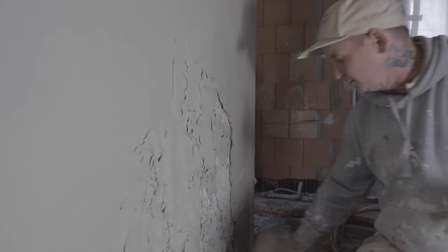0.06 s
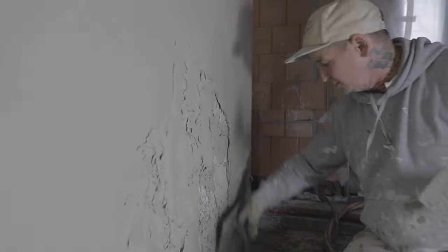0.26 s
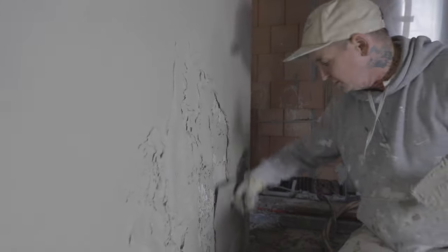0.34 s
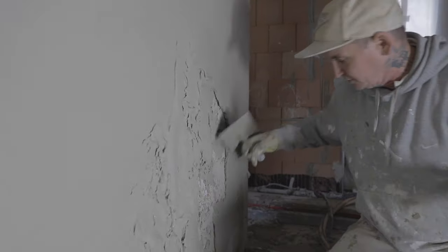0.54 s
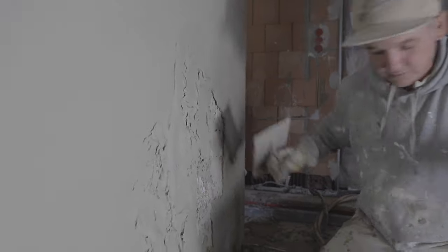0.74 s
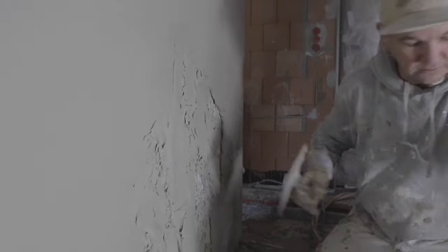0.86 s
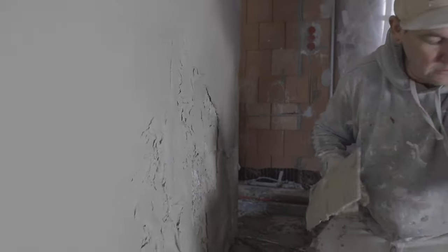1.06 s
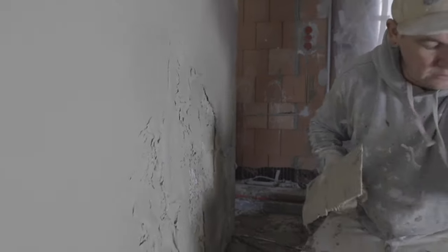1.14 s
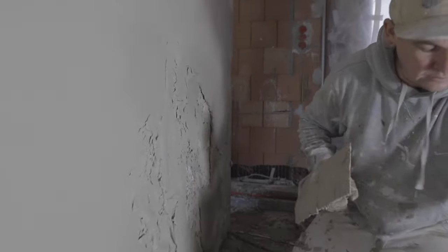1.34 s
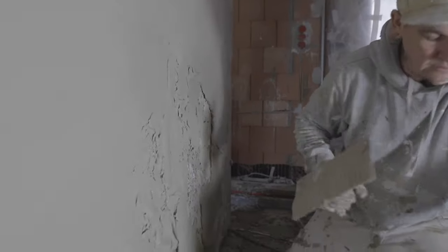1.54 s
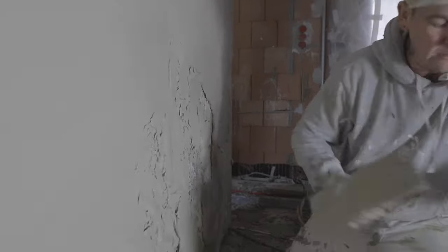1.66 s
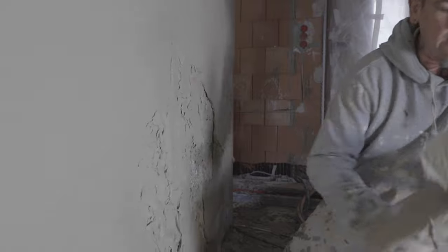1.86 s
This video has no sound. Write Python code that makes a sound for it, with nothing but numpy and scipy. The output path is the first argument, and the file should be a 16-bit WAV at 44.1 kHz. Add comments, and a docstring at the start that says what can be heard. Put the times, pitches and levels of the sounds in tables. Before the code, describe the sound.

A steel trowel knocks a hollow tub, scrapes gritty wet plaster, then taps and scrapes a hand float

```python
"""Bare masonry room, one microphone: a plasterer's steel trowel knocks a hollow tub, then drags through gritty
wet plaster, loud at first and dying away. Faint bright ticks follow as wet plaster lets go; then the blade taps
and scrapes the float in his other hand. Contacts are noise bursts exciting decaying modes, scrapes are random
sand grains. The walls ring after each sound; deep rumble follows the heavier moves. A faint site wash lies
under it all, with soft narrow swells far off near the start, middle and end."""
import sys
import numpy as np
from scipy import signal
from scipy.fft import rfft, irfft
from scipy.io import wavfile
from scipy.ndimage import uniform_filter1d

SR = 44100
rng = np.random.default_rng(int(sys.argv[2]) if len(sys.argv) > 2 else 0)


def master(y):
    """Save y as 16-bit WAV."""
    cut = np.clip(np.atleast_2d(y).T, -1, 1)
    pcm = np.round(cut * 32767)  # scale
    wavfile.write(sys.argv[1], SR, pcm.astype(np.int16))


def gain_from_decibels(decibels):
    """Convert decibel values to linear amplitude factors."""
    exponent = np.asarray(decibels, float) / 20
    return 10 ** exponent


N = 83790  # samples
T = np.arange(N) / SR  # s


def unit(x):
    """Scale to an rms of 1."""
    return x / np.sqrt(np.mean(x ** 2))


def unit_energy(x):
    """Scale to a sum of squares of 1."""
    return x / np.sqrt(np.sum(x ** 2))


def conv(x, response):
    """Let a signal excite a response, cut to the scene's length."""
    return signal.fftconvolve(x, response)[:N]


def fade(t60):
    """Exponential decay to -60 dB in t60 s."""
    return np.exp(-np.log(1000) * T / t60)


def colour(x, points):
    """Shape a spectrum by (f/Hz, level/dB) points; it drops abruptly beyond both ends."""
    hz, db = np.array(points, float).T
    f = np.maximum(np.fft.rfftfreq(len(x), 1 / SR), 1)
    gain_db = np.interp(np.log(f), np.log(hz), db, left=db[0] - 14.5, right=db[-1] - 30)
    return irfft(rfft(x) * gain_from_decibels(gain_db), len(x))


def band(x, hz, width_hz):
    """One broad resonance."""
    return signal.lfilter(*signal.iirpeak(min(hz, 0.4 * SR), hz / width_hz, fs=SR), x)


def walk(rate_hz):
    """Random levels, held and slewed; spread near 1."""
    hold = int(SR / rate_hz)
    steps = np.repeat(rng.standard_normal(N // hold + 1), hold)
    slewed = uniform_filter1d(uniform_filter1d(steps, hold), hold)
    return 2.16 * slewed[:N]


# Knocks of the trowel: t/s, crack level/dB, crack centre f/Hz, bright edge level/dB,
# hollow body level/dB, plate level/dB
TROWEL_KNOCKS = [(0.2390, -22.5, 1674, -21.5, -10, -18.5), (0.2402, -22, 3570, -32, -52, -33),
                 (.2425, -20, 948, -26.5, -36, -29), (1.1917, -30.5, 2350, -50, -65, -12),
                 (1.1990, -44, 1930, -53, -40, -17.5), (1.258, -29, 1170, -63, -14, -7.5),
                 (1.278, -41, 990, -67, -17, -44), (1.3640, -27, 1950, -51, -63, -21),
                 (1.3715, -35, 5400, -60, -29, -11), (1.3846, -24, 3400, -44, -30, -26),
                 (1.3853, -25, 5200, -53, -57, -52), (1.4164, -24, 1980, -42, -30, -34),
                 (1.4190, -31, 926, -60, -22, -19), (1.476, -39, 4000, -60, -32, -57),
                 (1.495, -51, 2000, -68, -29, -30.5), (1.540, -56, 1990, -70, -31.5, -29),
                 (1.5570, -37.5, 1370, -58, -35.5, -34), (1.5739, -33.5, 4170, -50, -62, -42),
                 (1.5866, -34, 1450, -66, -47, -23.5), (1.6333, -35, 4550, -74, -54, -37),
                 (1.64, -34, 3460, -63, -59, -21.5), (1.675, -41, 4780, -66, -43, -27),
                 (1.6930, -38.5, 4160, -54, -55, -28), (1.7071, -31.5, 2100, -53, -50, -26.5),
                 (1.716, -40.5, 2700, -58, -33, -22.5)]


def knocks(tub, float_body):
    """Each knock cracks, then rings the hollow body and the steel plate in its own shares."""
    size = 4096
    out, to_body = np.zeros(N + size), np.zeros(N)
    noise = rng.standard_normal((len(TROWEL_KNOCKS), 2, size))
    pitch_s, pitch = np.array(PLATE_TUNING).T
    for (s, db, hz, edge_db, body_db, plate_db), (crack_noise, edge_noise) in zip(TROWEL_KNOCKS, noise):
        i = int(s * SR)
        crack = burst(crack_noise, hz, 0.4 * hz, 0.016)
        edge = burst(np.diff(edge_noise, prepend=0), 9000, 17000, 0.014)  # differencing brightens it
        plate = ring_plate(np.interp(s, pitch_s, pitch))[:size]
        out[i:i + size] += gain_from_decibels(db) * crack + gain_from_decibels(edge_db) * edge - gain_from_decibels(plate_db) * plate
        to_body[i] = gain_from_decibels(body_db)
    return out[:N] + hollow(to_body, tub, float_body)


def burst(noise, hz, width_hz, t60):
    """Contact: a click and a short rattle of noise in one broad resonance, peak near 1."""
    rise_s, click_share = 0.0005, 1.22  # share: first contact against the rattle after it
    t = T[:len(noise)]
    shape = fade(t60)[:len(noise)] * (1 - np.exp(-t / rise_s))
    rattle = band(noise, hz, width_hz) * shape
    rattle = rattle * np.sqrt(np.sum(shape ** 2) / np.sum(rattle ** 2))
    click = click_share * np.sin(2 * np.pi * hz * t) * np.exp(-0.35 * hz * t)
    return 2 * band(rattle + click, hz, width_hz)


# Drag of the blade, in two passages: t/s, level/dB, treble level/dB, body rumble level/dB,
# plate rumble level/dB
BLADE_DRAG = [
    [(.25, -40, -41.5, -25, -33.5), (.33, -56, -55.5, -54, -51.5), (.41, -45.5, -47, -46, -50.5),
     (.43, -36.5, -44, -38, -41.5), (.465, -32.5, -41.5, -53, -33), (.515, -31, -44.5, -38, -34),
     (.545, -34.5, -45, -41, -35), (.585, -41.5, -55.5, -59, -36.5), (.66, -49, -61, -51, -78),
     (.75, -50.5, -71, -74, -60)],
    [(1.0, -95, -63.5, -101, -94), (1.06, -84, -63, -66, -51), (1.12, -84, -66, -83, -62.5),
     (1.185, -49, -61, -65, -53), (1.2, -34, -42, -54, -38.5), (1.25, -40.5, -54, -43, -32.5),
     (1.3, -45, -54, -53, -37.5), (1.36, -40, -51, -30, -54), (1.45, -41.5, -53, -31.5, -42),
     (1.55, -50, -55, -74, -68), (1.605, -38.5, -47.5, -32.5, -40.5), (1.65, -45, -48, -51.5, -59),
     (1.7, -44, -48, -41, -49), (1.72, -31.5, -51, -38.5, -50), (1.74, -52.5, -70, -43.5, -65),
     (1.9, -82, -103, -57, -60)],
]
# Hiss of the grit, relative spectrum: f/Hz, level/dB per Hz
GRIT_HISS = [(200, -39), (330, 10), (600, -7.5), (900, 2), (1500, 1.5), (2200, -1.5), (3300, -2.5),
             (4500, -10.5), (5500, -28), (7500, -43)]
# Treble of the grit, relative spectrum: f/Hz, level/dB per Hz
GRIT_SIZZLE = [(3500, -5), (5000, -10.5), (6800, -10), (9700, -18), (14200, -21.5), (16000, -27)]


def drag(tub, float_body):
    """Sand grains catch under the blade in patches; they hiss and shake body and plate."""
    rows = np.concatenate([np.array(passage, float) for passage in BLADE_DRAG])

    def curve(column):
        return gain_from_decibels(np.interp(T, rows[:, 0], rows[:, column], left=-120))

    def patches():
        return gain_from_decibels(1.3 * walk(260))  # patchiness in dB, rate in Hz

    def damped(response, t60):
        return unit_energy(response * fade(t60))

    grains = sand_grains()
    hiss = curve(1) * patches() * unit(colour(grains, GRIT_HISS))
    sizzle = curve(2) * patches() * unit(colour(grains, GRIT_SIZZLE))
    rumble = hollow(unit(grains) * curve(3), damped(tub, 0.27), damped(float_body, 0.048))
    force = unit(grains) * curve(4) * patches()
    pitch_s, pitch = np.array(PLATE_TUNING).T
    plate = np.zeros(N)
    # the force passes from one tuning of the plate to the next
    for share, factor in zip(np.eye(len(pitch)), pitch):
        part = force * np.sqrt(np.interp(T, pitch_s, share))
        plate += conv(part, damped(ring_plate(factor), 0.046))
    return hiss + sizzle + rumble + plate


def sand_grains():
    """Sparse impulses of scattered size over a steady bed of fine noise."""
    grains_per_s = 3500  # on average
    scatter_db = np.where(T < TUB_UNTIL_S, 1.5, 3.6)  # wet in the tub, crusty on the float
    sizes = gain_from_decibels(scatter_db * rng.exponential(size=N)) * rng.standard_normal(N)
    caught = rng.random(N) < grains_per_s / SR
    return unit(np.clip(sizes, -12, 12) * caught) + 1.74 * rng.standard_normal(N)


TUB_UNTIL_S = 1  # the tub sounds before this time, the float after


def hollow(force, tub, float_body):
    """Early forces ring the tub, later ones the float."""
    early = T < TUB_UNTIL_S
    return conv(force * early, tub) + conv(force * ~early, float_body)


# Modes of the hollow tub, before the push and the bass loss: f/Hz, level/dB, t60/s
TUB_MODES = [(136, -5.5, 0.11), (217.6, 7, 0.046), (237, -4, 0.12), (271.6, -10.5, 0.325), (320, -25, 0.15),
             (436, -10.5, 0.15)]


def ring_tub():
    """The tub's decaying modes after a short push."""
    return ring(TUB_MODES)


# Modes of the float in the other hand, before the push and the bass loss: f/Hz, level/dB, t60/s
FLOAT_MODES = [(224.6, -6, 0.29), (233.8, -10.5, 0.94), (269, -1, 0.28), (294, -15, 0.13), (439, -14, 0.15)]


def ring_float():
    """The float's decaying modes after a short push."""
    return ring(FLOAT_MODES)


# Modes of the steel plate, before tuning, the push and the bass loss: f/Hz, level/dB, t60/s
PLATE_MODES = [(651.5, 1, 0.034), (734, -1.5, 0.03), (1078, -8.5, 0.04), (1184, -14, 0.066)]
# The plate rings higher or lower with how it is held and loaded: t/s, pitch factor on f
PLATE_TUNING = [(.45, 1.098), (1.3, 0.99), (1.6, 1.043), (1.69, 1.148), (1.72, 1.45)]


def ring_plate(factor):
    """The plate's decaying modes after a short push, all scaled in pitch by one factor."""
    return ring(PLATE_MODES, factor)


def ring(modes, factor=1):
    """Response of an object to a short push; it swells briefly and radiates no deep bass."""
    push_s, rise_s, radiates_from_hz = 0.00078, 0.0014, 173
    push = np.hanning(int(push_s * SR) + 2)
    response = sum(gain_from_decibels(db) * np.sin(2 * np.pi * hz * factor * T) * fade(t60) for hz, db, t60 in modes)
    response = response * (1 - np.exp(-T / rise_s))
    high_pass = signal.butter(2, radiates_from_hz, "high", fs=SR)
    return signal.lfilter(*high_pass, conv(response, push / push.sum()))


# Faint bright ticks of wet plaster letting go: t/s, level/dB
PLASTER_TICKS = [(.9705, -56), (.9890, -52), (1.0195, -52), (1.0360, -54)]


def ticks():
    """Wet plaster lets go in tiny bright clicks."""
    size = 1024
    out = np.zeros(N)
    for (s, db), noise in zip(PLASTER_TICKS, rng.standard_normal((len(PLASTER_TICKS), size))):
        i = int(s * SR)
        out[i:i + size] += gain_from_decibels(db) * burst(noise, 11800, 6400, 0.0043)
    return out


# Decay of the bare walls: f/Hz, t60/s
WALL_DECAY = [(100, 1.45), (300, 1.06), (1000, 0.61), (4000, 0.21), (7000, 0.066), (14000, 0.088)]
# Colour of the walls' tail, relative: f/Hz, level/dB
WALL_COLOUR = [(60, -13), (250, -6), (1000, -5), (4000, 2), (7000, -2), (15000, 5)]


def room(x):
    """Diffuse tail of bare walls, each octave with its own decay."""
    level_db, rise_s = -15.5, 0.0028
    hz, t60 = np.array(WALL_DECAY).T
    tail = np.zeros(N)
    for f in 90 * 2.0 ** np.arange(8):
        octave = band(rng.standard_normal(N), f, 1.18 * f)
        tail += octave * fade(np.interp(np.log(f), np.log(hz), t60))
    tail = colour(tail, WALL_COLOUR) * (1 - np.exp(-T / rise_s))
    return gain_from_decibels(level_db) * conv(x, unit_energy(tail))


# Deep rumble under the heavier moves: t/s, level/dB
DEEP_RUMBLE = [(.239, -64), (0.246, -31.5), (.28, -47), (.46, -53), (.49, -39.5), (.62, -47.5),
               (0.791, -61), (1.159, -73.5), (1.198, -46), (1.25, -55), (1.35, -53), (1.372, -31),
               (1.43, -34.5), (1.58, -50.5), (1.9, -59)]


def deep():
    """Low rumble that follows the heavier moves: noise passed twice through one resonance."""
    hz, width_hz = 121.3, 76  # width of each pass
    s, db = np.array(DEEP_RUMBLE).T
    noise = band(band(rng.standard_normal(N), hz, width_hz), hz, width_hz)
    return gain_from_decibels(np.interp(T, s, db, left=-120)) * unit(noise)


# Wash of the building site, relative spectrum: f/Hz, level/dB per Hz
SITE_WASH = [(20, 6.5), (60, -3.5), (105, -5.5), (150, -12.5), (250, -3.5), (440, -10.5), (700, -11),
             (1150, -7.5), (1700, -12), (2600, -14.5), (3700, -12), (4700, -19), (5700, -25), (9000, -32),
             (15200, -40), (16500, -58)]


def site():
    """Faint steady wash of the building site: coloured noise, wavering a little."""
    level_db = -50.5 + 0.7 * walk(8)
    return gain_from_decibels(level_db) * unit(colour(rng.standard_normal(N), SITE_WASH))


# Faint far-off narrow swells: centre t/s, half length t/s, f/Hz, level/dB
FAR_SWELLS = [(0.038, 0.017, 275, -43.5), (0.819, 0.059, 1000, -54), (1.86, 0.096, 1220, -62)]


def far():
    """Soft swells of narrow noise from elsewhere on the site."""
    out = np.zeros(N)
    for s, half_s, hz, db in FAR_SWELLS:
        swell = np.exp(-((T - s) / half_s) ** 2)
        out += gain_from_decibels(db) * swell * unit(band(rng.standard_normal(N), hz, 21))
    return out


def scene():
    """Trowel work near the microphone, its room, and the site behind."""
    tub, float_body = ring_tub(), ring_float()
    near = knocks(tub, float_body) + drag(tub, float_body) + ticks()
    return (near + room(near) + deep() + site() + far())[None]


def band_limit(x):
    """A steep low-pass at the top of the band."""
    return signal.sosfilt(signal.butter(12, 16680, fs=SR, output="sos"), x)


def record(dry):
    """The microphone rolls off steeply at the very top."""
    roll_off = signal.cheby1(10, 1, 16000, fs=SR, output="sos")  # order, ripple in dB, edge in Hz
    mix = signal.sosfilt(roll_off, dry)
    return band_limit(mix)


dry = scene()
out = record(dry)
master(out)
```